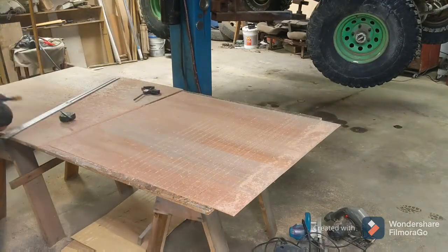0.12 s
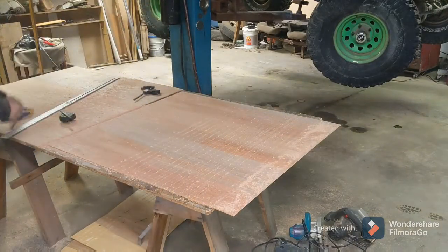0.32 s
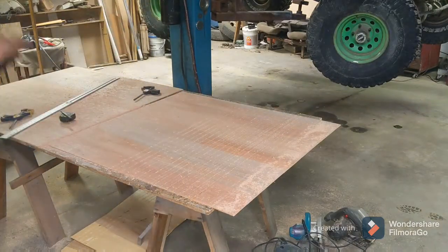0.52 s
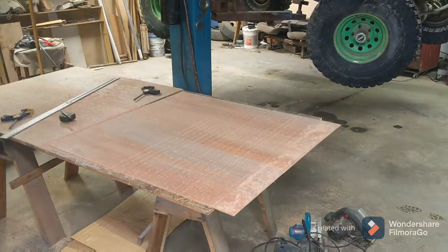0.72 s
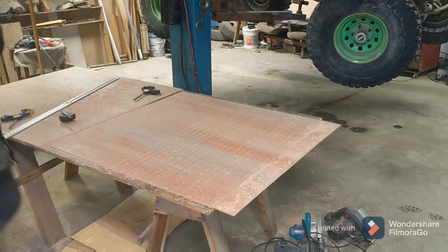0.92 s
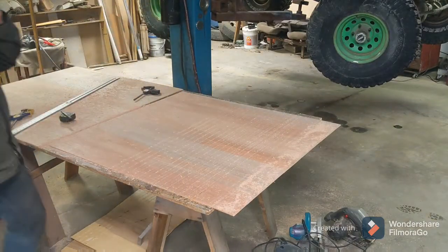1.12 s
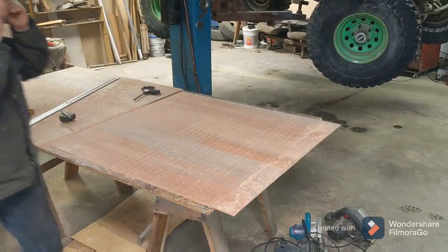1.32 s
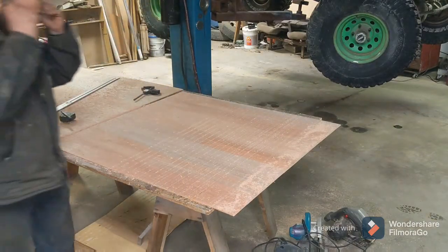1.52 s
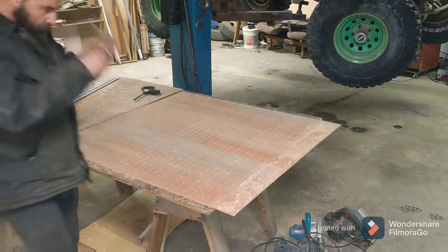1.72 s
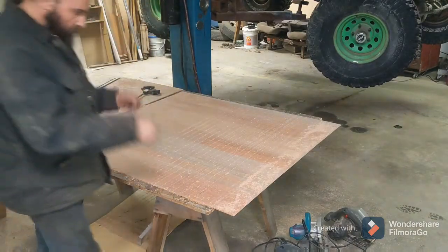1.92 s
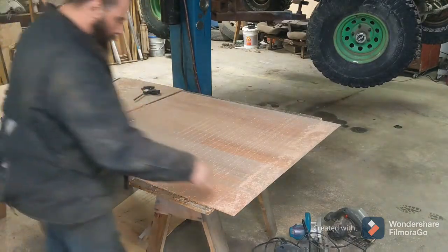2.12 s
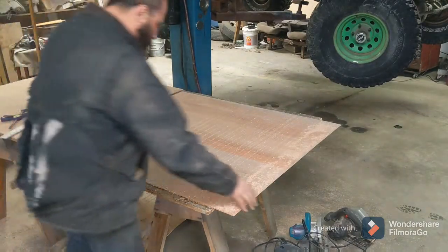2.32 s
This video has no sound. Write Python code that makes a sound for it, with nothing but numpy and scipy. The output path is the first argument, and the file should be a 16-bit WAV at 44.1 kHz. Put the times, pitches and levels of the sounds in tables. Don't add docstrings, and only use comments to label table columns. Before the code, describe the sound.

Two clamps drop onto a plywood sheet with a thud and clatter, then boots scuff and knuckles knock

```python
import sys
import numpy as np
from scipy import signal
from scipy.fft import rfft, irfft
from scipy.io import wavfile

SR = 44100
rng = np.random.default_rng(int(sys.argv[2]) if len(sys.argv) > 2 else 0)


def to_wav(s):
    ch = np.atleast_2d(s).T
    pcm = np.round(np.clip(ch, -1, 1) * 32767)
    wavfile.write(sys.argv[1], SR, pcm.astype(np.int16))


def ratio_of_db(decibels):
    return 10 ** (np.asarray(decibels, float) / 20)


N = 110250
T = np.arange(N) / SR

# (time [s], peak level [dB])
THUDS = [(.2252, -10.5), (.2275, -7.5), (.2290, -10), (.2322, -17), (.2345, -8), (.2362, -15), (.2380, -6),
         (.2410, -13.5), (.2445, -14), (.2480, -22), (.2535, -20), (.2570, -24.5), (.2585, -18.5),
         (.2640, -18), (.2715, -16.5), (.2755, -21), (.2865, -16), (.296, -25)]
# (time [s], peak level [dB])
SLAPS = [
    (.4922, -28),
    (.498, -26),
    (.5293, -9),
    (.5328, -8),
    (.5352, -11),
    (.5415, -10),
    (.5451, -11),
    (.5473, -10),
    (.5528, -11),
]
# (frequency [Hz], side minus mid [dB])
WIDTH = [(60, -15), (110, -119), (200, -30), (380, -3), (700, -3.5), (1290, -3), (2380, 0.5), (4400, -0.5),
         (8120, 1), (15000, -2.5)]


def rms_one(x):
    return x / np.sqrt(np.mean(x ** 2) + 1e-20)


def at_hz(points, hz):
    p = np.array(points)
    return np.interp(np.log(np.maximum(hz, 1)), np.log(p[:, 0]), p[:, 1])


def colour(x, points, share=1):
    size = 8192
    hz = np.arange(size // 2 + 1) * SR / size
    cepstrum = irfft(share * at_hz(points, hz) * np.log(10) / 20)
    cepstrum[1:size // 2] *= 2
    cepstrum[size // 2 + 1:] = 0
    response = irfft(np.exp(rfft(cepstrum)))[None, :size // 2]
    return signal.fftconvolve(np.atleast_2d(x), response)[:, :N]


def low_cut(x, hz):
    return signal.sosfilt(signal.butter(3, hz, "high", fs=SR, output="sos"), x)


def ring(x, hz, t60):
    radius, w = ratio_of_db(-60 / (t60 * SR)), 2 * np.pi * hz / SR
    return signal.lfilter([0, np.sin(w)], [1, -2 * radius * np.cos(w), radius * radius], x + 1e-18)


def modal(drive, modes):
    return sum((-1) ** k * ratio_of_db(db) * ring(drive, hz, t60) for k, (hz, db, t60) in enumerate(modes))


def clicks(rows, lag=0):
    out = np.zeros(N)
    for s, db in rows:
        out[min(int((s + lag) * SR), N - 1)] -= ratio_of_db(db)
    return out


def ports(x):
    left_lead_s = 0.000083
    return np.array([x, np.interp(T - left_lead_s, T, x)])


def stereo(mid, side, width):
    return mid + colour(side, width) * [[1], [-1]]


def struck(rows, spectrum, crack_db, chatter_db):
    split_hz, chatter_t60_s = 2200, .045
    push = clicks(rows)
    fade = ratio_of_db(-120 * T[:4096] / chatter_t60_s)
    power = np.abs(signal.fftconvolve(push ** 2, fade / fade.sum())[:N])
    chatter = rng.standard_normal((2, N)) * np.sqrt(power)
    low, high = (signal.butter(2, split_hz, kind, fs=SR, output="sos") for kind in ("low", "high"))
    x = ports(signal.sosfilt(low, push))
    x = x + signal.sosfilt(high, ratio_of_db(crack_db) * push + ratio_of_db(chatter_db) * chatter)
    return colour(x, spectrum) / np.abs(colour(clicks([(0, 0)]), spectrum)).max()


def floor():
    # (frequency [Hz], level [dB])
    noise_spectrum = [(12, -39), (20, 2.5), (123, -17), (187, -22), (410, -22), (641, -25), (4410, -36.5),
                      (5680, -36.5), (16000, -46)]
    # (frequency [Hz], side minus mid [dB])
    noise_width = [(60, -44), (110, -8), (200, -2.5), (380, 1.5), (700, 0), (1290, -5.5), (2380, 1),
                   (4400, 3), (8120, -0.5), (15000, 0.5)]
    # (frequency [Hz], rms level [dB])
    hum = [(122, -63.5), (248, -76), (75.5, -63.5)]
    mid, side = rng.standard_normal((2, N))
    hiss = rms_one(colour(stereo(mid, side, noise_width), noise_spectrum))
    return ratio_of_db(-52.5) * hiss + sum(ratio_of_db(db + 2.5) * np.sin(2 * np.pi * hz * T) for hz, db in hum)


def shop(x):
    # (frequency [Hz], reverberation time t60 [s])
    decay = [(60, 0.97), (200, 0.7), (700, 0.26), (1500, 0.45), (4000, .52), (8000, 0.46), (14000, 0.23)]
    room_db, build_s = 10, 0.003
    size = int(.9 * SR)
    t, edges, tail = T[:size], 40 * 2 ** np.arange(0, 9, .5), 0
    white = rng.standard_normal((2, 2, size))
    for k, (low, high) in enumerate(zip(edges, edges[1:])):
        band = signal.sosfilt(signal.butter(2, [low, high], "band", fs=SR, output="sos"), white[k % 2])
        tail = tail + band * ratio_of_db(-60 * t / at_hz(decay, np.sqrt(low * high)))
    tail = tail * (1 - np.exp(-t / build_s))
    tail = ratio_of_db(room_db) * tail / np.sqrt(np.sum(tail[0] ** 2))
    mid, side = signal.fftconvolve(x[None], tail)[:, :N]
    return stereo(mid, side, WIDTH)


def friction(rows, spectrum):
    grains_per_s, spread_db, grit_cycles = 18000, 2, 21
    sizes = ratio_of_db(spread_db * np.minimum(rng.exponential(1, (2, N)), 5)) * rng.choice([-1, 1], (2, N))
    mid, side = sizes * (rng.random((2, N)) < grains_per_s / SR)
    grains = stereo(mid, side, WIDTH)
    hiss, out = rms_one(colour(grains, spectrum)), 0
    for s, rise, hold, fall, db, hz, grit_db in rows:
        stroke = np.clip((T - s) / rise, 0, 1) ** 2
        stroke = stroke * ratio_of_db(-60 * np.maximum(T - s - rise - hold, 0) / fall)
        grit = rms_one(ring(grains, hz, grit_cycles / hz))
        out = out + stroke * (ratio_of_db(db) * hiss + ratio_of_db(grit_db) * grit)
    return out


def scuffs():
    # (start [s], rise [s], hold [s], fall t60 [s], level [dB], grit pitch [Hz], grit level [dB])
    strokes = [
        (1.298, 0.0019, 0.0083, 0.2, -59, 4160, -55.5),
        (1.466, 0.0077, 0.027, 0.53, -50.5, 7800, -57.5),
        (1.655, 0.082, 0.071, 0.71, -54.5, 4330, -60.5),
        (1.954, 0.0038, 0.023, 0.11, -64.5, 8950, -91),
        (2.089, 0.027, 0.064, 0.59, -46.5, 14620, -58.5),
        (2.397, 0.037, 0.094, 0.63, -67, 5700, -71),
    ]
    # (frequency [Hz], level [dB])
    rub_spectrum = [(100, -30), (300, 0.5), (900, -2.5), (2200, -16.5), (4000, -3.5), (10000, -8.5),
                    (14000, -12.5), (16000, -13.5)]
    return friction(strokes, rub_spectrum)


def slides():
    # (start [s], rise [s], hold [s], fall t60 [s], level [dB], grit pitch [Hz], grit level [dB])
    strokes = [
        (-.02, 0.01, 0.01, 1, -53, 4020, -68),
        (.09, 0.052, 0.37, 0.2, -49.5, 1000, -53),
    ]
    # (frequency [Hz], level [dB])
    slide_spectrum = [(90, -6.5), (200, 6), (500, -21.5), (1200, -7), (2200, -14), (5500, -10.5),
                      (15500, -25.5)]
    return friction(strokes, slide_spectrum)


def steps():
    # (time [s], peak level [dB], pitch [Hz], ring t60 [s])
    taps = [(1.300, -44, 1000, 0.026), (1.301, -41, 3050, 0.01), (1.3, -45, 453, 0.034),
            (1.303, -42.5, 1600, 0.0075), (1.470, -36, 220, 0.039), (1.4711, -41, 600, 0.012),
            (1.745, -41, 300, 0.02), (2.1045, -42, 310, 0.06), (2.111, -36, 320, 0.03),
            (2.138, -41, 310, 0.05), (2.1075, -54, 800, .015), (2.146, -47, 600, .02),
            (2.303, -36, 210, 0.035), (2.3022, -37, 480, 0.012), (2.3025, -37, 800, 0.012),
            (.672, -30, 720, .03), (2.338, -48, 800, 0.0083)]
    return sum(ring(clicks([(s, db)]), hz, t60) for s, db, hz, t60 in taps)


def knuckles():
    # (time [s], peak level [dB])
    knocks = [
        (2.4452, -24),
        (2.4485, -28),
        (2.4499, -23),
        (2.4548, -28),
        (2.4610, -30),
        (2.4695, -27),
        (2.4800, -25),
        (2.4847, -23),
        (2.4885, -29),
        (2.4942, -29),
    ]
    # (frequency [Hz], level [dB])
    knock_spectrum = [(29, -51), (305, -11.5), (449, 3.5), (711, -8), (1200, 1), (2000, -13.5),
                      (5940, -31.5), (16000, -50)]
    # (frequency [Hz], level [dB], t60 [s])
    edge_modes = [(129.5, -20.5, .1), (223, -12.5, 0.03), (460, -12.5, 0.023), (530, -19, .04),
                  (940, -8.5, 0.029), (1166, -21, 0.011), (1580, -8, 0.0096)]
    knock = struck(knocks, knock_spectrum, crack_db=-39, chatter_db=0.5)
    return knock, modal(ratio_of_db(-1.5) * clicks(knocks), edge_modes)


def boom():
    # (time [s], peak level [dB])
    pushes = [
        (.240, -16),
        (.492, -36.5),
        (.546, -20),
    ]
    # (frequency [Hz], level [dB], t60 [s])
    low_modes = [(119.4, 0, .33), (145, 0, 0.27)]
    push = np.convolve(clicks(pushes), np.hanning(177) / 88)[:N]
    return low_cut(sum(ratio_of_db(db) * ring(push, hz, t60) for hz, db, t60 in low_modes), 80.4)


def sheet_under_clamps():
    # (frequency [Hz], level [dB], t60 [s])
    sheet_modes = [(62, -38, 0.46), (186.7, -7, 0.53), (227.4, -1, 0.25), (265, -0.5, 0.16),
                   (303, -6.5, 0.32), (387.6, -5.5, 0.2), (496.5, -15, 0.43), (532, -17, 0.22),
                   (630, -18, 0.07), (838, -10.5, 0.093), (960, -16.5, 0.2), (1000, 1.5, .08),
                   (1240, -8, 0.029), (1580, -1, 0.05)]
    lag_s = 0.00402
    drive = ratio_of_db(-16.5) * clicks(THUDS, lag_s) + ratio_of_db(-21.5) * clicks(SLAPS, lag_s)
    return modal(drive, sheet_modes)


def pad_ring(rows):
    # (frequency [Hz], level [dB], t60 [s])
    pad_modes = [(254, -16.5, 0.038), (501.6, -11.5, 0.041), (762, -9, 0.025), (932, -4, 0.049),
                 (1060, -5, 0.019), (1220, -4, 0.016)]
    contact_s = 0.00053
    force = np.hanning(int(contact_s * SR) + 3)
    touch = np.convolve(clicks(rows), force)[:N] / (contact_s * SR / 2)
    return ratio_of_db(3) * low_cut(modal(touch, pad_modes), 170)


def pad_bounces():
    # (time [s], peak level [dB])
    bounces = [
        (.669, -28.5),
        (.6745, -29),
        (.736, -31),
        (.743, -34),
        (.858, -44),
        (.864, -38.5),
        (.885, -50),
        (.929, -62),
    ]
    return pad_ring(bounces)


def first_clamp():
    # (frequency [Hz], level [dB])
    thud_spectrum = [(30, -14.5), (70, -8.5), (130, 2), (380, 0), (900, -1.5), (1750, -20.5), (2200, -26.5),
                     (16000, -46.5)]
    # (time [s], peak level [dB])
    rattles = [
        (.2275, -27),
        (.240, -36.5),
        (.252, -37),
        (.2645, -20),
        (.272, -23),
        (.282, -34),
    ]
    handle_spectrum = [(1500, -45), (5000, 24.5), (8000, 23), (15000, 16.5)]
    thud = struck(THUDS, thud_spectrum, crack_db=-11, chatter_db=7.5)
    return thud + struck(rattles, handle_spectrum, crack_db=2.5, chatter_db=-6.5)


def second_clamp_pad():
    # (time [s], peak level [dB])
    touches = [
        (.4920, -15),
        (.4945, -15),
        (.4995, -14),
        (.5068, -18),
        (.5125, -22),
        (.5322, -7),
        (.5338, -10),
    ]
    # (frequency [Hz], level [dB])
    pad_spectrum = [(30, -66), (150, -50), (270, -34), (900, -7), (1500, 16), (3000, 12), (7700, -1),
                    (16000, -9.5)]
    clatter = ratio_of_db(-1.5) * struck(touches, pad_spectrum, crack_db=-1.5, chatter_db=8.5)
    ping = ring(clicks([(.4975, -23.5)]), 11800, 0.0087)
    return clatter + ports(pad_ring(touches) + ping)


def second_clamp_bar():
    # (frequency [Hz], level [dB])
    slap_spectrum = [(30, -97), (90, -32), (200, -11), (600, -6), (1000, -1.5), (1700, -5), (5500, -17.5),
                     (16000, -38)]
    snap = ratio_of_db(4) * ring(clicks(SLAPS), 1400, .003)
    return struck(SLAPS, slap_spectrum, crack_db=5.5, chatter_db=-1.5), snap


def scene():
    thud, pad = first_clamp(), second_clamp_pad()
    slap, snap = second_clamp_bar()
    knock, edge = knuckles()
    board = sheet_under_clamps() + edge
    boots, bounces, swing = steps(), pad_bounces(), boom()
    direct = thud + pad + slap + knock + ports(board + snap + swing + boots + bounces)
    wet = (ratio_of_db(-12.5) * thud + ratio_of_db(-18.5) * pad + ratio_of_db(-1.5) * slap + ratio_of_db(-10.0) * knock)[0]
    wet = wet + ratio_of_db(-42) * board + ratio_of_db(-18.5) * boots + ratio_of_db(-17.0) * bounces
    reverberant = shop(low_cut(wet, 157) + ratio_of_db(-32) * swing)
    return direct + reverberant + slides() + scuffs() + floor()


def top_cut(x):
    return signal.sosfilt(signal.butter(12, 16120, fs=SR, output="sos"), x)


def record(dry):
    # (frequency [Hz], width [Hz], level [dB])
    resonances = [(5700, 124, 8.5), (9620, 660, 4), (11670, 430, 6)]
    # (frequency [Hz], left minus right [dB])
    tilt = [(60, 0), (200, .5), (380, 1), (700, 4.5), (1290, 1.5), (2380, .7), (4400, 1.3), (8120, 3),
            (15000, 9.5)]
    x = dry
    for hz, width_hz, db in resonances:
        x = x + (ratio_of_db(db) - 1) * signal.lfilter(*signal.iirpeak(hz, hz / width_hz, SR), dry)
    x = np.array([colour(x[0], tilt, .5)[0], colour(x[1], tilt, -.5)[0]])
    x = signal.sosfilt(signal.ellip(10, .5, 70, 16000, fs=SR, output="sos"), np.clip(x, -1, 1))
    return top_cut(x)


dry = scene()
out = record(dry)
to_wav(out)
```